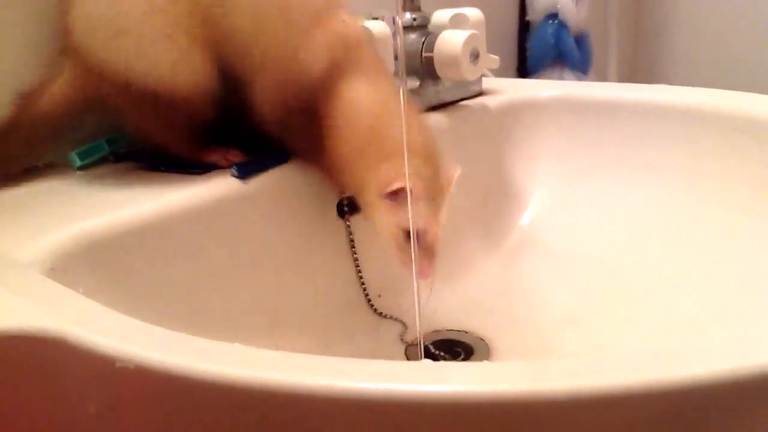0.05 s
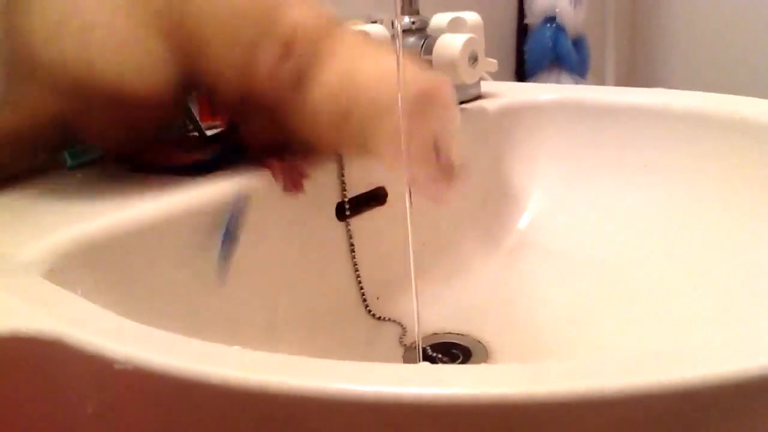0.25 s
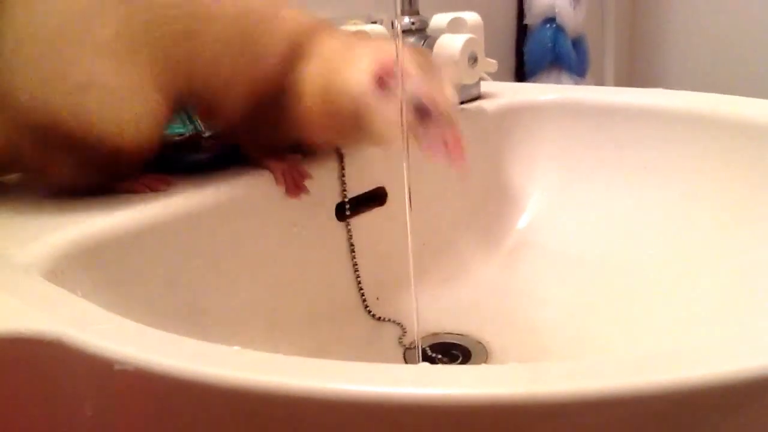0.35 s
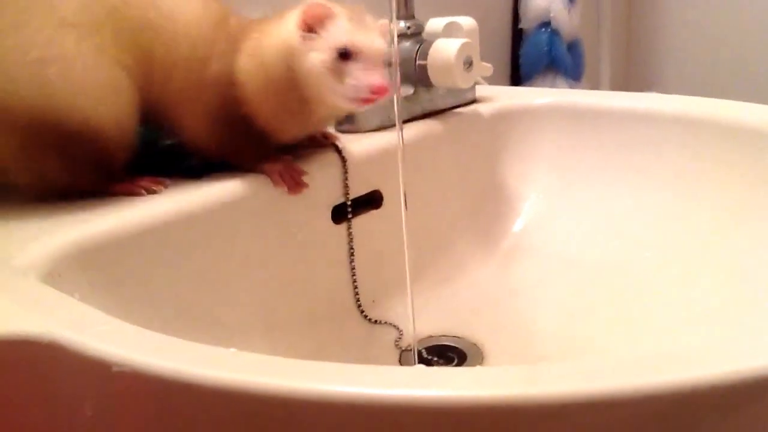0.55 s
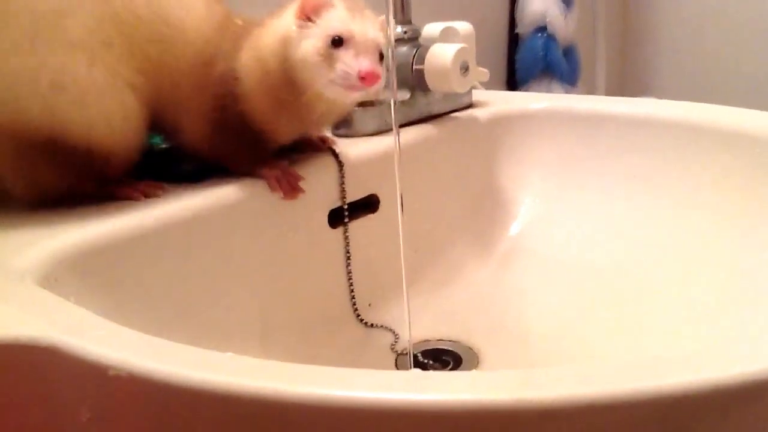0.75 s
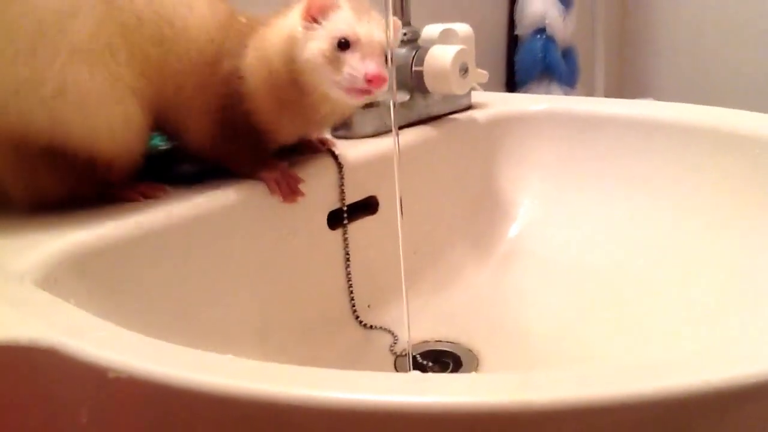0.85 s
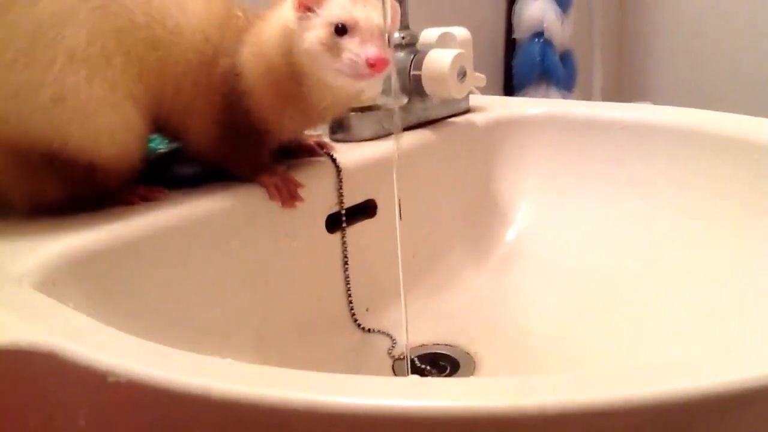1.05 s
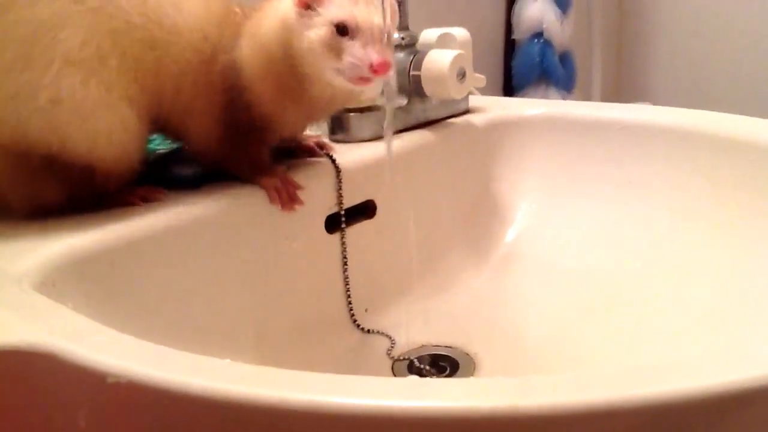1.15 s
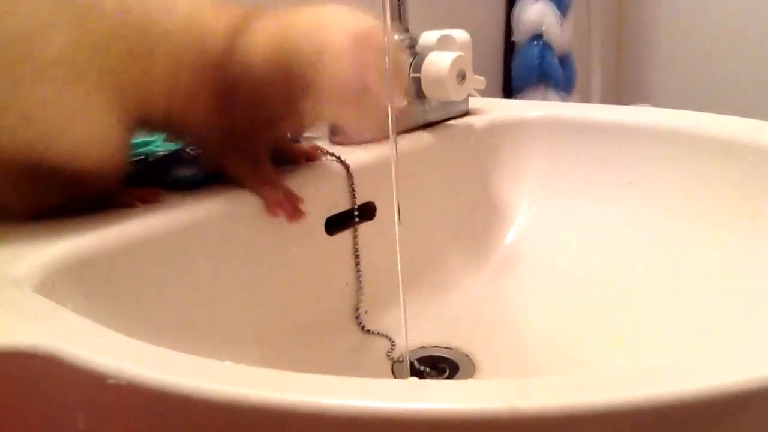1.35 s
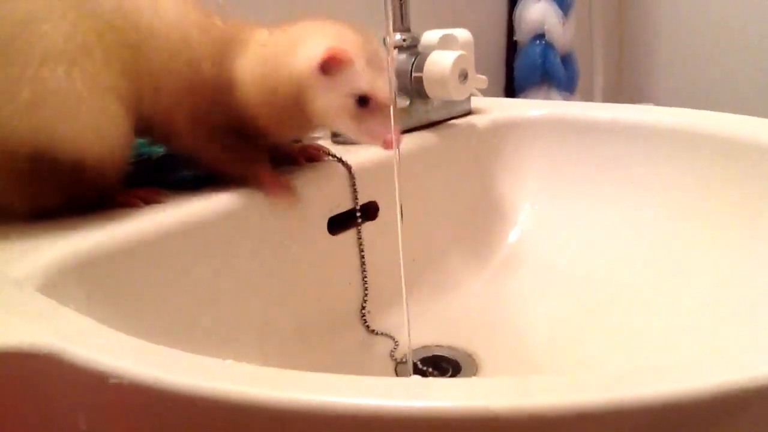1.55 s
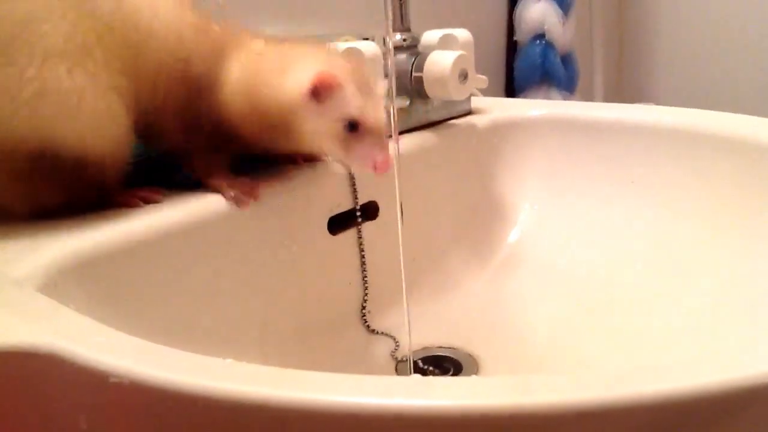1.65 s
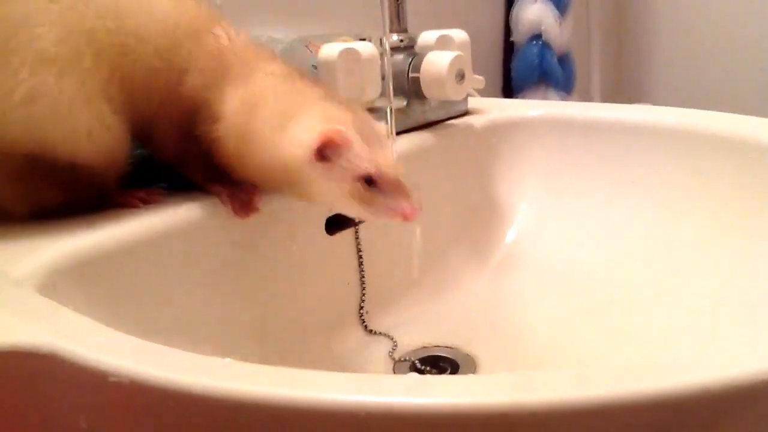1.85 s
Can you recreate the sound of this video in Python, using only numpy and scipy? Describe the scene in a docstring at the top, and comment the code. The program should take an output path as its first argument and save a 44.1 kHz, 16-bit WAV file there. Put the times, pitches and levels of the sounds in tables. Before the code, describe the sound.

Close, uneven dripping and splashing of tap water in a sink eases to a faint trickle, then picks up again. Light hollow knocks from a ferret moving on the basin join both spells, with a short bathroom echo.

```python
"""A thin stream from a tap runs into an empty ceramic sink while a ferret moves about on the rim.
The water slaps into splashes, ticks on the glaze and traps tiny bubbles that ring as drips.
The animal knocks the hollow basin, scuffs it, squeaks on the wet glaze and clinks the plug chain.
The small bathroom answers each of these with a short echo, and hums and hisses faintly underneath."""
import sys
import numpy as np
from scipy import signal
from scipy.fft import rfft, irfft
from scipy.io import wavfile

SR = 44100
rng = np.random.default_rng(int(sys.argv[2]) if len(sys.argv) > 2 else 0)


def output_pcm(signal):
    """Save a mono or channel-first signal as 16-bit PCM at the path in sys.argv[1].

    Samples are clipped to [-1, 1] before scaling.
    """
    pcm = np.clip(np.atleast_2d(signal).T, -1, 1) * 32767
    wavfile.write(sys.argv[1], SR, np.round(pcm).astype(np.int16))


N = 83790


def amp(db):
    """Turns decibels into a number to multiply a sound by."""
    return 10 ** (np.asarray(db) / 20)


def unit(x):
    """Scales a sound to an average strength (rms) of 1."""
    return x / np.sqrt(np.mean(x ** 2) + 1e-20)


def seconds(size=16384):
    """The time of each sample in one event."""
    return np.arange(size) / SR


def read(points, hz):
    """Reads between the rows of a (frequency, value) table, with octaves evenly spaced."""
    f, value = np.transpose(points)
    return np.interp(np.log(hz + 1), np.log(f + 1), value)


def add(mix, s, sound):
    """Mixes a sound in, starting at s seconds."""
    part = mix[max(round(s * SR), 0):][:len(sound)]
    part += sound[:len(part)]


def bell(hz, centre, octaves):
    """A smooth hump that favours frequencies near the centre; more octaves make it wider."""
    return 1 / (1 + (np.log2((hz + 1) / centre) / octaves) ** 2 / 4) ** 4


def noise(gain, size=16384):
    """Steady noise of strength 1; gain(hz) says how much of each frequency it holds."""
    spectrum = rfft(rng.standard_normal(size)) * gain(np.fft.rfftfreq(size, 1 / SR))
    return unit(irfft(spectrum, size))


def burst(gain, decay):
    """A short puff of noise, coloured by gain(hz), that swells at once and dies away."""
    t = seconds()
    fall = np.exp(-t / decay) * (1 - np.exp(-t / 0.00056))
    white = np.roll(rng.standard_normal(len(t)) * fall, 12)  # starts late: colouring smears it both ways
    puff = irfft(rfft(white) * gain(np.fft.rfftfreq(len(t), 1 / SR)))
    return unit(puff * (t < t[-1] / 2)) * np.sqrt(np.mean(fall ** 2))


def bubble(hz, rise):
    """A tiny note, like a ringing bubble: it swells for rise seconds and dies, climbing a little."""
    t = seconds(size=1024)
    age = t / rise
    climb_per_s = 5.3  # as a share of the starting pitch
    swell = (age * np.exp(1 - age)) ** 1.66
    return swell * np.sin(2 * np.pi * hz * t * (1 + climb_per_s * t / 2))


def drips():
    """Single drops either ring a bubble with a soft splat, or tick on the hard glaze."""
    # drops that ring a bubble: (time [s], pitch [Hz], level [dB], rise time [s])
    ringing_drops = [(.3643, 6650, -18, 0.00041), (0.4816, 4470, -20.5, 0.00067),
                     (0.4878, 6640, -16, 0.00055), (.4934, 6800, -16.5, 0.00039),
                     (0.5548, 4750, -16, 0.00056), (.557, 5800, -21.5, .0006), (0.565, 6780, -13, 0.00064),
                     (0.567, 3470, -22.5, 0.00052), (0.5877, 6730, -13, 0.00059),
                     (.5888, 6760, -11, 0.00038), (0.7271, 3185, -28, 0.0016), (.8832, 8250, -13, 0.00027),
                     (0.938, 4300, -35, 0.0011), (1.089, 4840, -35.5, 0.00053),
                     (1.2086, 3700, -9.5, 0.00024), (1.2313, 5770, -13, 0.00054),
                     (1.2496, 6230, -5, 0.00041), (1.2841, 5470, -1.5, 0.00024),
                     (1.2835, 3560, -6.5, 0.00035), (1.3024, 3210, -11.5, 0.00056),
                     (1.376, 9260, -15, 0.00023), (1.422, 3020, -19.5, 0.0004), (1.487, 6240, -19, 0.00049),
                     (1.5471, 6300, -14, 0.00056), (1.588, 6740, -9, 0.0008),
                     (1.5895, 3580, -17.5, 0.00031), (1.6349, 6430, -14, 0.00052),
                     (1.639, 5830, -19.5, 0.0008), (1.768, 2960, -36.5, 0.0023)]
    # drops that tick: (time [s], centre frequency [Hz], level [dB], fade time [s])
    ticking_drops = [(.160, 7000, -35, .001), (0.1798, 5470, -34, 0.0029), (0.5467, 6000, -19, 0.0012),
                     (0.592, 9200, -16, 0.001), (0.6005, 9100, -12.5, 0.00044),
                     (1.1896, 7400, -29.5, 0.0012), (1.207, 7000, -15.5, .0012), (1.285, 4350, -22, 0.0036),
                     (1.301, 7400, -12.5, 0.00069), (1.3481, 6400, -21.5, 0.0013),
                     (1.3663, 7800, -25, 0.0012), (1.376, 3450, -29.5, 0.0027),
                     (1.3825, 6850, -24.5, 0.0015), (1.4165, 6740, -13, 0.001), (1.4842, 5850, -24, 0.0017),
                     (1.4922, 3430, -25, 0.0038), (1.5534, 7560, -14.5, .0009),
                     (1.6214, 3830, -15, 0.00051), (1.6313, 4800, -27, 0.01), (1.7142, 4400, -37.5, 0.0021),
                     (1.838, 4860, -32, 0.0022)]
    out = np.zeros(N)
    for s, hz, db, rise in ringing_drops:
        add(out, s, amp(db) * bubble(hz, rise))
        splat = burst(lambda f: bell(f, hz, octaves=0.71), decay=0.0013)
        add(out, s, amp(db - 15.5) * splat)
    for s, hz, db, decay in ticking_drops:
        add(out, s, amp(db) * burst(lambda f: bell(f, hz, octaves=0.43), decay))
    return out


def splashes():
    """Water slaps the sink, and a softer, fine spray trails off."""
    # slaps of water: (time [s], level [dB], fade time [s], treble tilt above 1000 Hz [dB per octave])
    slaps = [(.036, -30, 0.007, 0.5), (0.2375, -24, 0.0055, -8), (0.388, -7.5, 0.0027, 0.5),
             (0.4015, -12, 0.0045, 1.5), (0.4765, -20.5, 0.0039, -3), (1.478, -35, 0.033, -2)]
    # tone colour of a splash: (frequency [Hz], relative level [dB])
    splash_colour = [(60, -48), (300, -48), (700, -15.5), (1500, -11), (2800, -6), (3400, -0.5),
                     (4700, -2.5), (5900, 0.5), (8200, -2.5), (9300, -3), (11500, -5.5), (15000, -10)]
    out = np.zeros(N)
    for s, db, decay, tilt in slaps:
        colour = lambda f: amp(read(splash_colour, f) + tilt * np.log2(np.maximum(f, 1000) / 1000))
        slap = burst(colour, decay)
        spray = amp(-9.5) * burst(colour, decay=0.028)
        add(out, s, amp(db) * (slap + spray))
    return out


def showers():
    """Loose clouds of tiny droplets are thrown up between the larger drops."""
    # droplet clouds: (time [s], length [s], typical level [dB], typical pitch [Hz])
    clouds = [(0.413, .1, -39, 7500), (0.544, .08, -33.5, 7740), (.67, .1, -44.5, 6300),
              (1.222, .13, -36, 6900), (1.351, .09, -38.5, 8200), (1.473, .08, -36, 6400),
              (1.593, .06, -32.5, 6740)]
    drops_per_s, spread_octaves, spread_db = 420, 0.39, 5
    out = np.zeros(N)
    for s, length, db, hz in clouds:
        chances = np.clip(rng.standard_normal((64, 3)), -2, 2)
        for k, (late, pitch, size) in enumerate(chances):
            delay = (k + late) / drops_per_s
            if delay < length:
                droplet = bubble(hz * 2 ** (spread_octaves * pitch), rise=0.00018)
                add(out, s + delay, amp(db + spread_db * size) * droplet)
    return out


def trickle():
    """Tiny bubbles tick faintly, at random, where the thin stream lands."""
    ticks_per_s, low_hz, high_hz = 80, 2320, 8000
    out = np.zeros(N)
    for when, pitch, size in rng.random((int(ticks_per_s * N / SR), 3)):
        tick = bubble(low_hz * (high_hz / low_hz) ** pitch, rise=0.00015)
        add(out, when * N / SR, amp(-47 + 8 * size) * tick)
    return out


def knocks():
    """Each knock of the animal is a short note and a dull thud, and rings the basin near its pitch."""
    # hollow knocks: (time [s], base level [dB], pitch [Hz])
    hits = [(0.035, -34.5, 1068), (.238, -26.5, 950), (.352, -36.5, 675), (.389, -51, 1500),
            (.422, -24, 1330), (0.447, -30.5, 892), (.466, -26.5, 1005), (.497, -26, 800), (.526, -29, 750),
            (0.562, -22, 1050), (.568, -28.5, 1620), (.579, -20.5, 838), (.591, -27.5, 1137),
            (1.21, -30, 1705), (1.284, -36.5, 1010), (1.305, -30.5, 1630), (1.393, -38.5, 1100),
            (1.403, -37, 1380), (1.535, -34.5, 1360), (1.556, -36, 1200), (1.6, -23.5, 943),
            (1.604, -30, 1970), (1.602, -13, 1345), (1.621, -17.5, 798), (1.642, -23, 760),
            (1.64, -31.5, 1470)]
    # the basin's own notes: (pitch [Hz], relative level [dB], time to fade by 60 dB [s])
    basin_notes = [(660, -32, 0.036), (752, -5, 0.12), (967, -8, .045), (1043, 0.5, 0.058),
                   (1296, -8, 0.085), (1337, 0, 0.082), (1603, -5.5, 0.045), (1850, -2, 0.021)]
    out, t = np.zeros(N), seconds()
    onset = 1 - np.exp(-t / 0.0025)
    for s, db, pitch in hits:
        ring = np.zeros(len(t))
        for hz, note_db, fade in basin_notes:
            strength = bell(hz, pitch, octaves=0.56) * amp(note_db - 60 * t / fade)
            ring += strength * np.sin(2 * np.pi * (hz * t + rng.random()))
        note = bubble(pitch, rise=0.0022)
        thud = burst(lambda f: bell(f, pitch, octaves=0.4), decay=0.0046)
        add(out, s, amp(db - 5) * note)
        add(out, s, amp(db - 10.5) * onset * ring)
        add(out, s, amp(db - 22) * thud)
    return out


def scuffs():
    """Paws and fur rub the basin: a grainy noise that swells and fades with each move."""
    # rubs: (time [s], length [s], level [dB], centre frequency [Hz])
    rubs = [(0.316, 0.056, -46, 3530), (0.497, 0.14, -37, 2400), (1.379, 0.053, -47, 1490),
            (1.52, .05, -44.5, 2380), (1.599, 0.048, -40.5, 2060), (1.709, 0.092, -47.5, 2430)]
    out = np.zeros(N)
    for s, length, db, hz in rubs:
        grain = amp(4.5 * noise(lambda f: 1 / (1 + (f / 250) ** 2)))  # a fast flutter in level
        rub = noise(lambda f: bell(f, hz, octaves=0.76))
        swell = np.sin(np.pi * np.minimum(seconds() / length, 1))
        add(out, s, amp(db) * swell * unit(grain * rub))
    return out


def clink():
    """The plug chain rings briefly as the animal pulls back."""
    # the chain's own notes: (pitch [Hz], relative level [dB], time to fade by 60 dB [s])
    chain_notes = [(2505, -0.5, 0.037), (4640, -2, 0.027), (7200, -25, 0.047), (7590, -0.5, 0.068)]
    out, t = np.zeros(N), seconds()
    ring = sum(amp(db - 60 * t / fade) * np.sin(2 * np.pi * hz * t) for hz, db, fade in chain_notes)
    add(out, s=0.238, sound=amp(-27.5) * ring)
    return out


def squeak():
    """Rubbing on the wet glaze makes a faint, fuzzy tone that climbs, is loudest early and trails off."""
    start_hz, climb_hz_per_s, fuzz_hz, length_s = 2600, 6700, 240, 0.17
    out, t = np.zeros(N), seconds()
    fuzz = noise(lambda f: 1 / (1 + (f / fuzz_hz) ** 2))
    tone = np.sin(2 * np.pi * t * (start_hz + climb_hz_per_s * t / 2))
    progress = np.minimum(t / length_s, 1)
    arch = np.sqrt(4 * progress * (1 - progress))
    early_peak = np.exp(-2.6 * abs(progress - 0.29))
    add(out, s=0.66, sound=amp(-47.5) * unit(fuzz * tone) * arch * early_peak)
    return out


def bathroom(x, room_db, bowl_db):
    """Sound bounces quickly inside the bowl, then dies away in the small room."""
    # how long the room echoes: (frequency [Hz], time to fade by 60 dB [s])
    echo_times = [(300, 0.33), (1300, 0.31), (3500, 0.17), (7000, 0.14), (14000, 0.17)]
    t = seconds()
    hz, times, bands = signal.stft(rng.standard_normal(len(t)), SR, nperseg=256)
    fade = amp(-60 * times / read(echo_times, hz)[:, None])  # each band of noise fades at its own speed
    tail = signal.istft(bands * fade, SR, nperseg=256)[1][:len(t)]
    tail *= 1 - np.exp(-t / 0.0068)  # the echo takes a moment to build
    bowl = rng.standard_normal(len(t)) * np.exp(-t / 0.0026) * (t > 0.001)
    echo = (amp(room_db) * unit(tail) + amp(bowl_db) * unit(bowl)) / np.sqrt(len(t))
    return x + signal.fftconvolve(x, echo)[:N]


def background():
    """Water and room hiss softly, over a low hum that wavers and sinks for a while."""
    # loudness of the hum: (time [s], level [dB])
    hum_levels = [(0, -43.5), (.12, -43.5), (.3, -44.5), (1.2, -46.5), (1.33, -52), (1.6, -51.5),
                  (1.72, -49), (1.9, -46)]
    # faint steady tones beside the hum: (pitch [Hz], level [dB])
    steady_tones = [(135, -64.5), (452, -65.5), (585, -64.5), (635, -62.5)]
    # tone colour of the hiss: (frequency [Hz], relative level [dB])
    hiss_colour = [(25, -40), (70, -35), (100, -15.5), (135, -8), (200, -5), (300, -12.5), (600, -9.5),
                   (800, -16.5), (1100, -15.5), (2000, -18), (2700, -19.5), (4300, -23.5), (6700, -20),
                   (9000, -26.5), (15000, -36.5)]
    hum_hz, waver_width_hz = 186.4, 38.4
    t = seconds(size=N)
    hum_db = np.interp(t, *np.transpose(hum_levels))
    hiss_db = -48.5 + 0.62 * (hum_db - hum_db.mean())  # the hiss partly follows the hum
    hiss = noise(lambda f: amp(read(hiss_colour, f)), size=N)
    tones = sum(amp(db) * unit(np.sin(2 * np.pi * (hz * t + rng.random()))) for hz, db in steady_tones)
    waver = noise(lambda f: 1 / (1 + ((f - hum_hz) / waver_width_hz) ** 2) ** 2, size=N)
    hum = unit(unit(np.sin(2 * np.pi * hum_hz * t)) + 0.57 * waver)
    return amp(hiss_db) * hiss + amp(hum_db) * hum + tones


def scene():
    """Water and animal in the bathroom, in one channel; the knocks get a stronger echo."""
    water = drips() + splashes() + showers() + trickle()
    animal = scuffs() + squeak() + clink()
    light_sounds = bathroom(water + animal, room_db=-7.5, bowl_db=-7.5)
    hollow_knocks = bathroom(knocks(), room_db=-6, bowl_db=3)
    return (light_sounds + hollow_knocks + background())[None]


def record(dry):
    """A small microphone loses the deep bass, clips anything too loud and cuts the highest treble."""
    low_hz, high_hz = 51, 15300
    bass_cut = signal.butter(4, low_hz, "high", fs=SR, output="sos")
    treble_cut = signal.firwin(255, high_hz, window=("kaiser", 8), fs=SR)
    clipped = np.clip(signal.sosfilt(bass_cut, dry), -1, 1)
    return signal.oaconvolve(clipped, treble_cut[None], "same")


dry = scene()
out = record(dry)
output_pcm(out)
```